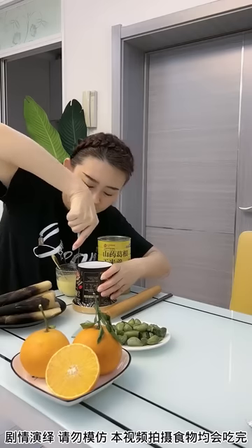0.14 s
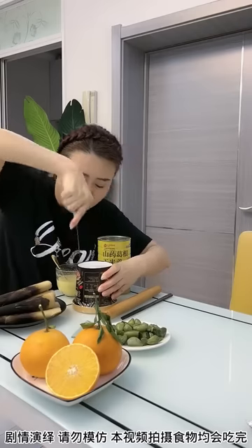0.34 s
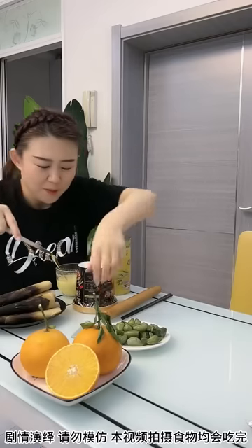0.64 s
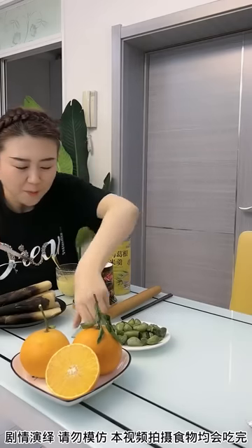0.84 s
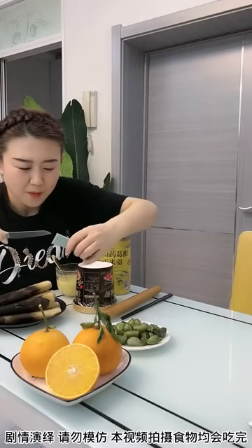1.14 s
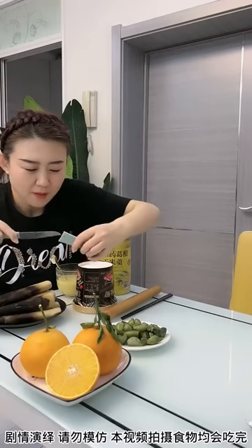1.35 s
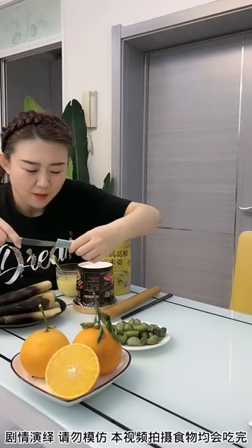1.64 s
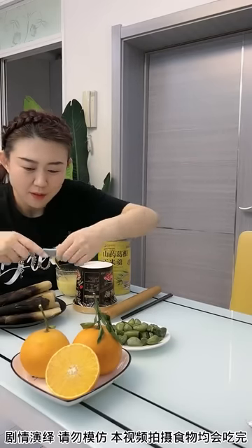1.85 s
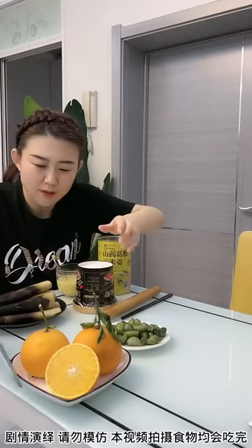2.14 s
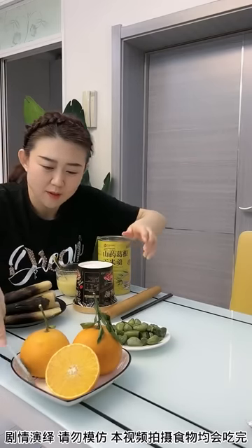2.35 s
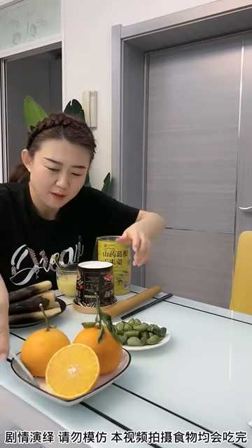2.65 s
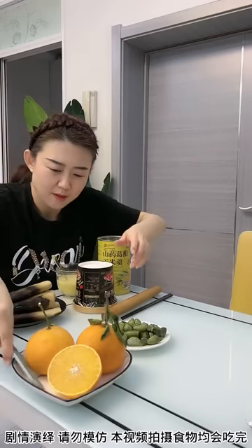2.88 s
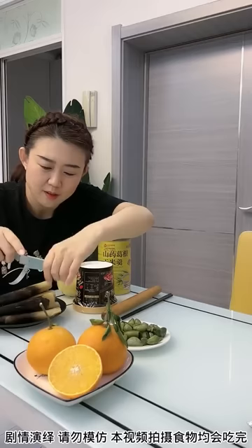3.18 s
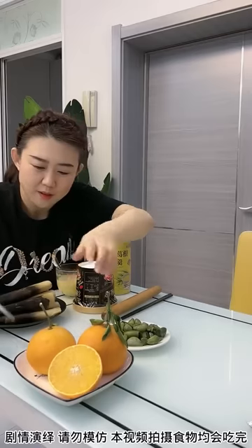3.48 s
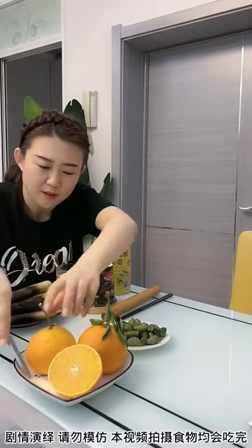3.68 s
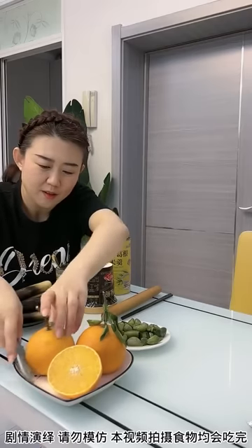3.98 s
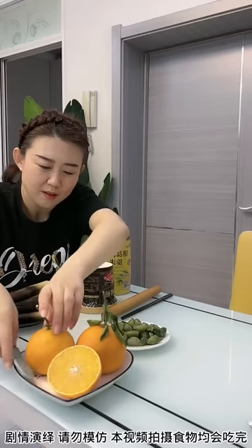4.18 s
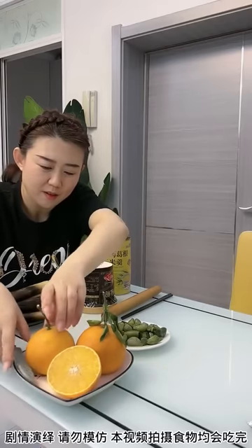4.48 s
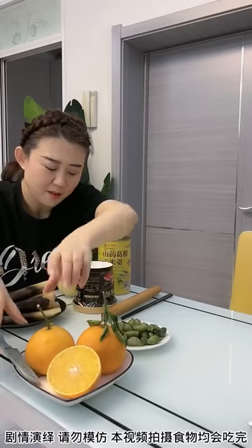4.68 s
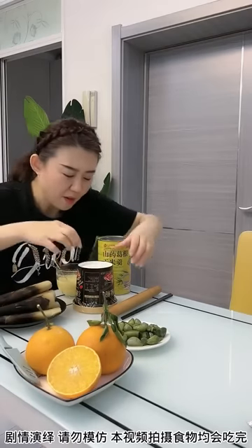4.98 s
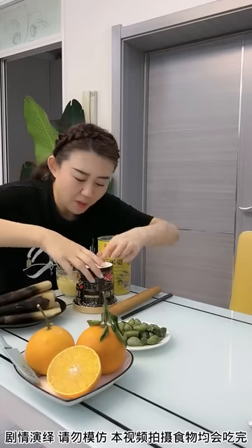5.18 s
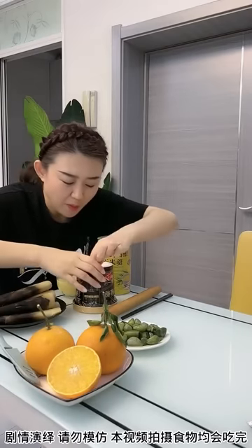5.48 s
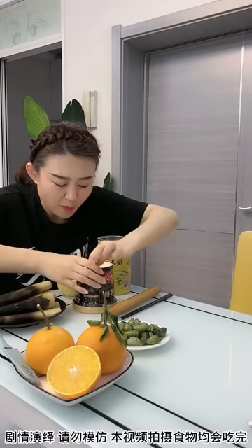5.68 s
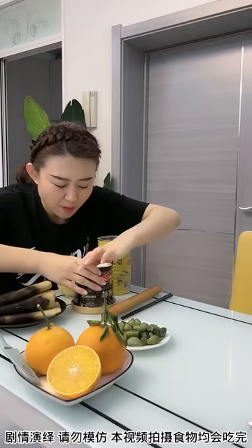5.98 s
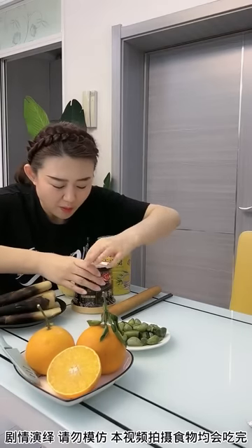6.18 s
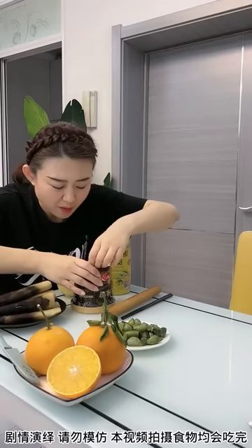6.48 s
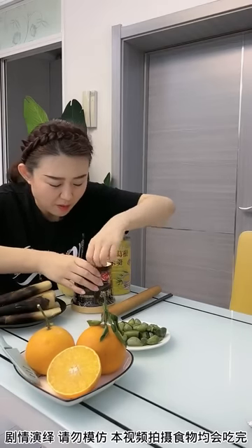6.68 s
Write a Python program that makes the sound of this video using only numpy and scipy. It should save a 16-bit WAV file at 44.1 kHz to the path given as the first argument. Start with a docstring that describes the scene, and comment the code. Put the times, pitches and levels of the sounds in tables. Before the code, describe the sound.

Close stereo microphone at a kitchen table with a short, hard room tail. Brief squeaky prying scrapes open it, then a loud knock and a light metal piece settling. A quiet middle holds isolated steel clicks, scuffs and dull china taps, one strong. The end is dense, uneven rubbing of a hollow can with a sharp snap and a last deep pop.

```python
"""First a rim squeaks, rasps and snaps as a knife pries the lid off a small can at a kitchen table.
The metal is dropped, tapped and laid on a china plate; then hands press and twist the lid on the can.
Contacts are noise bursts with decaying modes, rubbing is stick-slip jerks through a hollow body,
thumps are short low tones, and a small, hard room answers each with a diffuse noise tail.
A low rumble and a faint hiss lie beneath."""
import sys
import numpy as np
from scipy import signal
from scipy.fft import rfft, irfft, next_fast_len
from scipy.io import wavfile
from scipy.ndimage import uniform_filter1d, map_coordinates

SR = 44100
rng = np.random.default_rng(int(sys.argv[2]) if len(sys.argv) > 2 else 0)


def store_pcm(level_fs):
    """Save levels as 16-bit WAV."""
    pcm = np.round(np.clip(level_fs, -1, 1) * 32767).astype(np.int16)
    wavfile.write(sys.argv[1], SR, np.atleast_2d(pcm).T)


N = 301203

# Noise spectrum of a crack on the board or the rim.
# Each row: frequency in Hz, density in dB per Hz.
CRACK_SPECTRUM = [(40, -40), (120, -18), (250, -4), (600, -2), (1150, -4), (1800, 2), (2400, -1), (3200, 1),
                  (5000, -3), (10000, -5), (12500, -11), (16000, -17)]
# Noise spectrum of a crack of steel.
# Each row: frequency in Hz, density in dB per Hz.
STEEL_SPECTRUM = [(40, -45), (300, -14), (900, -4), (1400, -9), (2100, -5), (3000, 2), (4300, -2),
                  (5000, 2), (6300, -6), (7500, 1), (8700, -6), (10400, -3), (12500, -10), (16000, -15)]


def amp(db):
    """Level law: decibels to an amplitude gain."""
    return 10 ** (np.asarray(db) / 20)


def unit(x):
    """Normalisation by mean power: scaled to rms 1."""
    return x / np.sqrt(np.mean(x ** 2) + 1e-20)


def along(points, hz):
    """Logarithmic frequency scale: (Hz, value) points read between on a log axis."""
    f, value = np.transpose(points)
    return np.interp(np.log(hz + 1), np.log(f + 1), value)


def filtered(x, response):
    """Linear filtering: the spectrum of x times a complex response of frequency."""
    n = x.shape[-1]
    size = next_fast_len(n + SR // 10)
    return irfft(rfft(x, size) * response(np.fft.rfftfreq(size, 1 / SR)), size)[..., :n]


def coloured(x, points, size=2048):
    """Minimum phase: a causal filter whose gain follows the (Hz, dB) points, by folding the cepstrum."""
    cepstrum = irfft(np.log(amp(along(points, np.fft.rfftfreq(size, 1 / SR)))))
    cepstrum[1:size // 2] *= 2
    cepstrum[size // 2 + 1:] = 0
    impulse = irfft(np.exp(rfft(cepstrum)))
    return signal.fftconvolve(x, impulse)[:len(x)]


def dying(t, t60):
    """Exponential decay: 60 dB are lost in t60 seconds."""
    return np.exp(-np.log(1000) * t / t60)


def add(track, s, sound):
    """Superposition: a sound mixed into the track at time s."""
    start = max(round(s * SR), 0)
    track[start:start + len(sound)] += sound[:max(N - start, 0)]


def wobble(rate):
    """Band-limited fluctuation: a smooth random curve, rate knots a second."""
    knots = rng.standard_normal(int(N * rate / SR) + 4)
    return map_coordinates(knots, [np.arange(N) * rate / SR])


def chatter(t, depth_db, rate=450):
    """Repeated contact: hard surfaces touch many times, which makes a fast, uneven gain."""
    knots = rng.standard_normal(1000)
    return amp(depth_db * np.interp(t * rate, np.arange(len(knots)), knots))


def echo(x):
    """Diffuse reverberation: a fresh noise tail of x, each frequency dying at its own speed."""
    # Each row: frequency in Hz, decay time t60 in seconds.
    decay_times = [(100, .35), (500, 0.17), (2000, .19), (5000, 0.18), (10000, 0.17), (16000, 0.013)]
    hz, t, z = signal.stft(rng.standard_normal(SR // 3), SR, nperseg=256)
    z = z * dying(t, along(decay_times, hz)[:, None])
    tail = signal.istft(z, SR, nperseg=256)[1]
    t = np.arange(len(tail)) / SR
    build_up_s = 0.009
    tail = tail * (1 - np.exp(-(t / build_up_s) ** 2)) * chatter(t, depth_db=2.5)
    return signal.fftconvolve(x, tail / np.linalg.norm(tail))[:len(x)]


def in_room(x, wet_db):
    """Superposed sound fields: the direct sound and the room's answer."""
    return x + amp(wet_db) * echo(x)


def two_ports(x, direct_db, diffuse_db=-17):
    """Stereo difference: the ports differ by a phase shift of the direct sound and by the diffuse field."""
    # Side signal of the direct sound, before direct_db. Each row: frequency in Hz, level in dB.
    direct_width = [(100, -12.5), (350, -11.5), (700, -3), (1300, 3), (2100, -17), (4400, -2.5), (8000, 2),
                    (15000, -7.5)]
    # Side signal of the diffuse field, before diffuse_db. Each row: frequency in Hz, level in dB.
    diffuse_width = [(100, -17.5), (300, -13.5), (600, 7), (1500, -12.5), (4000, -3.5), (12000, 0.5)]

    def shifted(hz):
        gain = amp(direct_db + along(direct_width, hz))
        return gain * 1j * np.cos(2 * np.pi * np.log2(hz + 1))

    diffuse = filtered(echo(x), lambda hz: amp(diffuse_db + along(diffuse_width, hz)))
    side = filtered(x, shifted) + diffuse
    return np.array([x + side, x - side])


def slips(rate, spread_db):
    """Stick and slip: random tiny jerks of very unequal size, about rate of them a second."""
    slipping = rng.random(N) < rate / SR
    size = amp(spread_db * np.clip(rng.standard_normal(N), -2, 2))
    return unit(slipping * size * rng.choice([-1, 1], N))


def patchy(x, depth_db, size=512):
    """Shifting excitation: the touching spot keeps moving, so the favoured resonances keep changing."""
    z = signal.stft(x, nperseg=size)[2]
    field = uniform_filter1d(rng.standard_normal(z.shape), size=4, axis=0)
    field = uniform_filter1d(field, size=4, axis=1)
    gain = amp(depth_db * np.clip(unit(field), -2, 1))
    return signal.istft(z * gain, nperseg=size)[1][:N]


def stroke(t, length):
    """Friction follows load: the hand's pressure swells to its hardest push at t = 0, then lets go."""
    away = np.abs(t) / length
    return np.exp(-np.minimum(away, 20) ** 1.19)  # exponent 1 is a pointed crest, 2 a bell


def hollow_can(f, pitch_hz):
    """Body resonance: the grip and the seat of the lid shift all the can's resonances together."""
    # Each row: centre and width as multiples of the can's pitch, level in dB.
    resonances = [(.55, .25, -9), (.78, .28, -4), (1, .24, 0), (1.3, .22, -6), (1.75, .4, -9),
                  (2.3, .5, -13)]
    low_hz = 190  # the can radiates little below this
    ratio = f / pitch_hz
    radiated = (1j * f / (low_hz + 1j * f)) ** 2
    body = 0
    for k, (centre, width, db) in enumerate(resonances):
        damping = 1j * ratio * width
        body = body + (-1) ** k * amp(db) * damping / (centre * centre - ratio * ratio + damping)
    return radiated * body


def rubbing(rows, body_db, rasp_db, catch_db, wet_db):
    """Stick-slip friction: clumps of jerks and larger catches rasp directly and sound the hollow body."""
    # Each row: frequency in Hz, density of the rasp in dB per Hz.
    rasp_spectrum = [(200, -40), (500, -12), (1000, 1), (1800, 0), (3000, -3.5), (4200, -7), (6500, -8),
                     (10000, -18), (12500, -28), (16000, -34)]
    fine = slips(rate=3400, spread_db=4) * amp(2 * wobble(160))
    jerks = unit(patchy(fine, depth_db=3))
    jerks = jerks + amp(catch_db) * slips(rate=140, spread_db=-0.5)
    grit = coloured(jerks, rasp_spectrum)
    track, t = np.zeros(N), np.arange(N) / SR
    for s, db, length, pitch_hz, edge_db in rows:
        near = np.abs(t - s) < 5 * length
        body = unit(filtered(jerks[near], lambda f: hollow_can(f, pitch_hz)))
        rasp = unit(grit[near])
        mixture = amp(body_db) * body + amp(rasp_db + edge_db) * rasp
        track[near] += amp(db) * stroke(t[near] - s, length) * mixture
    return in_room(track, wet_db)


def sliding(rows, colour, wet_db):
    """Sliding friction: fine slips, coloured and scaled by the pressure of each stroke."""
    jerks = patchy(slips(rate=4000, spread_db=3.5), depth_db=2.5)
    t = np.arange(N) / SR
    power = sum((amp(db) * stroke(t - s, length)) ** 2 for s, db, length in rows)
    return in_room(np.sqrt(power) * unit(coloured(jerks, colour)), wet_db)


def voiced(blow, levels_db):
    """Contact stiffness: the hardness of a contact sets the strength of its first 20 ms in each band."""
    # Edges of the bass, middle, treble and top, in Hz.
    band_edges = [150, 900, 3500, 8000, 16000]
    # Filter points for the bass, the two ends of the middle, the treble and the top, in Hz.
    tone_hz = [420, 1150, 2800, 5300, 11300]
    onset = blow[:SR // 50]
    spectrum = rfft(onset, SR)  # bins of 1 Hz
    power = np.cumsum(2 * np.abs(spectrum) ** 2) / (SR * len(onset))
    present_db = 10 * np.log10(np.diff(power[band_edges]) + 1e-20)
    bass, middle, treble, top = levels_db - present_db
    return coloured(blow, list(zip(tone_hz, [bass, middle, middle, treble, top])))


def contacts(rows, modes, colour, crack_t60, rise, impact_db, ring_db, sustain_db, wet_db, top_db):
    """Modal excitation: a touch and a short chatter ring the modes; weight adds bass, hardness treble."""
    track, t = np.zeros(N), np.arange(SR // 3) / SR
    hz, mode_db, t60 = np.transpose(modes)[:, :, None]
    for s, db, weight_db, hardness_db, touch, accent_hz in rows:
        free = np.maximum(t - touch, 0)
        # modes within about .07 octave of the favoured one ring up to 9 dB stronger
        accent_db = 9 * np.exp(-(np.log2(hz / accent_hz) / .07) ** 2)
        # most of the ring is damped as the touch ends; a weaker part lingers
        damped = amp(accent_db) * dying(free, t60=0.014)
        lingering = amp(sustain_db) * dying(t, t60)
        strength = amp(mode_db + 2 * rng.standard_normal(hz.shape))
        phase = rng.uniform(0, 2 * np.pi, hz.shape)
        partials = strength * np.sin(2 * np.pi * hz * t + phase)
        ring = np.sum(partials * (damped + lingering), axis=0)

        impact = amp(impact_db) * dying(free, t60=0.012)
        force = (impact + dying(t, crack_t60)) * chatter(t, depth_db=3)
        crack = coloured(rng.standard_normal(len(t)) * force, colour)

        swell = 1 - np.exp(-(t / (rise + .45 * touch)) ** 2)
        blow = unit(crack * swell) + amp(ring_db) * unit(ring * swell)
        levels_db = db + np.array([weight_db, 0, hardness_db, hardness_db + top_db])
        add(track, s, voiced(in_room(blow, wet_db), levels_db))
    return track


def ambience(rumble_db=1, hiss_db=-62, split_hz=320):
    """Stationary background noise: a low rumble of varying level and a faint, steady hiss."""
    # Each row: time in seconds, rumble level in dB before rumble_db.
    rumble_levels = [(0.0, -56), (0.85, -54), (1.15, -65.5), (1.75, -64.5), (2.3, -54), (6.83, -53.5)]
    # Each row: frequency in Hz, density in dB per Hz.
    air_spectrum = [(15, -18), (30, -6), (90, 2), (180, -4), (300, -14), (500, -20), (1000, -26),
                    (2000, -27), (4000, -32), (8000, -35), (11000, -40), (16000, -50)]
    air = coloured(rng.standard_normal(N), air_spectrum)
    low = filtered(air, lambda hz: 1 / (1 + (hz / split_hz) ** 4))
    times, level_db = np.transpose(rumble_levels)
    t = np.arange(N) / SR
    level = amp(np.interp(t, times, level_db)) * (t >= times[0]) * (t <= times[-1])
    return amp(rumble_db) * level * unit(low) + amp(hiss_db) * unit(air - low)


def surrounding():
    """Partial coherence: an independent side noise makes the ports differ by frequency, least in the bass."""
    # Each row: frequency in Hz, side level in dB.
    noise_width = [(100, -23), (200, -8.5), (400, 1.5), (1300, 5.5), (2200, -11.5), (3800, -1), (12000, -2)]
    mid = ambience()
    side = filtered(ambience(), lambda hz: amp(along(noise_width, hz)))
    return np.array([mid + side, mid - side])


def squeaks(overtone_db=-15):
    """Locked stick-slip: the metal edge catches, and its slips keep one unsteady pitch for milliseconds."""
    # Each row: centre in seconds, level in dB, mean pitch in Hz, half length in seconds.
    events = [(0.015, -32.5, 1492, 0.012), (0.034, -25.5, 976, 0.0047), (0.077, -26.5, 1486, 0.0093),
              (5.314, -18.5, 1415, 0.0051)]
    track, t = np.zeros(N), np.arange(N) / SR
    clock = np.cumsum(1 + .27 * wobble(1100)) / SR  # uneven time makes the pitch unsteady
    for s, db, hz, half in events:
        near = np.abs(t - s) < 4 * half
        phase = 2 * np.pi * hz * clock[near]
        tone = np.sin(phase) + amp(overtone_db) * np.sin(2 * phase)
        track[near] += amp(db) * np.exp(-((t[near] - s) / half) ** 2) * tone
    return in_room(track, wet_db=-17)


def prying():
    """Friction on a shell: the knife tip scrapes in short pushes under the lid."""
    # Each row: hardest push in seconds, level in dB, length in seconds, pitch of the can in Hz,
    # rasp of the edge in dB.
    pushes = [(0.015, -31.5, 0.027, 686, -7), (0.04, -26, 0.014, 916, -8.5), (0.078, -29, 0.01, 1380, -4.5),
              (0.1, -41.5, 0.02, 507, -6.5), (0.14, -29.5, 0.012, 470, -1.5), (0.2, -35, 0.023, 700, 4),
              (0.262, -34, 0.013, 484, 1.5), (0.33, -37.5, 0.02, 472, 5.5), (0.375, -27.5, 0.011, 487, 1.5),
              (0.425, -37.5, 0.022, 417, 2.5), (0.462, -35, 0.015, 470, -1), (0.497, -31, 0.0057, 530, 5.5),
              (0.524, -35.5, 0.0091, 483, 2.5)]
    return rubbing(pushes, body_db=-10, rasp_db=-5, catch_db=-11, wet_db=-6.5)


def snaps():
    """Damped modes: the lid snaps over the rim while the hand stifles its ring."""
    # Each row: start in seconds, strength in dB, weight in the bass in dB, hardness in the treble in dB,
    # touch length in seconds, favoured mode in Hz.
    events = [(0.185, -40.5, -8, -5, .005, 1736), (0.324, -44.5, -13, -6, .002, 2510),
              (0.344, -45, 8.5, -10.5, .003, 857), (0.379, -36, 15.5, -1.5, .007, 2510),
              (0.484, -47.5, 12.5, 9, .003, 5200), (5.311, -37.5, -0.5, 1.5, .004, 1736),
              (5.352, -32, 4.5, -11.5, .006, 2510), (5.463, -35, -11, -9, .004, 2510),
              (5.476, -35.5, 6.5, -9, .005, 2510), (5.703, -35.5, 13.5, -4, .007, 625),
              (5.764, -35, 13, -7, .008, 857), (6.22, -32.5, 2.5, -4.5, .01, 857),
              (6.246, -24.5, -2.5, -12, .004, 1736), (6.2535, -21.5, -5, -3.5, .002, 1736),
              (6.293, -38, 14, -10.5, .005, 460), (6.369, -37, -12, -17, .002, 1230),
              (6.411, -33.5, 11.5, -7, .003, 625), (6.431, -40, 7.5, -11, .005, 1230),
              (6.491, -35, -4, -16.5, .004, 857), (6.575, -40, -8, -11.5, .003, 1736),
              (6.607, -32.5, -8, -7, .0015, 1736), (6.661, -32, -17, -18, .002, 1230)]
    # Each row: frequency in Hz, level in dB, decay time t60 in seconds.
    lid_modes = [(460, -1, .1), (625, 1, .14), (857, -4, .12), (1230, -5, .08), (1736, 0, .06),
                 (1984, -5, .08), (2510, -3, .1), (3206, -6, .08), (5200, -10, .1), (5900, -9, .1)]
    return contacts(events, lid_modes, CRACK_SPECTRUM, crack_t60=0.035, rise=0.0008, impact_db=2,
                    ring_db=-2, sustain_db=-18, wet_db=-7.0, top_db=-8.5)


def thumps(overtone=1.83, wet_db=-16, overtone_db=-13, rise=0.002):
    """Panel vibration: flexing lid, hollow can or table top rings briefly and low, with one overtone."""
    # Each row: start in seconds, level in dB, pitch in Hz, decay time t60 in seconds.
    events = [(0.381, -8, 312, .075), (0.84, -23, 151.5, .11), (2.204, -30, 325, .11),
              (4.375, -27, 120.3, 0.062), (5.026, -19, 249.6, 0.12), (5.024, -21.5, 100.7, 0.21),
              (5.708, -2.5, 340.7, 0.027), (5.765, -17.5, 226, .07), (6.697, -3.5, 468.4, 0.071),
              (6.705, -7.5, 290, 0.055), (6.709, -9, 441, 0.021), (6.718, 1.5, 420.5, 0.054)]
    track, t = np.zeros(N), np.arange(SR // 3) / SR
    swell = 1 - np.exp(-(t / rise) ** 2)
    for s, db, hz, t60 in events:
        phase = 2 * np.pi * hz * t
        tone = np.sin(phase) + amp(overtone_db) * np.sin(overtone * phase)
        add(track, s, amp(db) * tone * dying(t, t60) * swell)
    return in_room(track, wet_db)


def knocks():
    """Impact on a plate: the knife handle and the can knock on the board and ring its modes."""
    # Each row: start in seconds, strength in dB, weight in the bass in dB, hardness in the treble in dB,
    # touch length in seconds, favoured mode in Hz.
    events = [(0.84, -18, -16, -17.5, 0.0014, 1976), (0.844, -20, -15.5, -11, 0.0014, 883),
              (0.8474, -18.5, -14, -17.5, .004, 3210), (0.882, -34, 0, -11.5, .004, 1976),
              (0.945, -35, -9, -3, 0.012, 2700), (2.191, -36, -5.5, -6.5, 0.0078, 1523),
              (2.203, -42, -0.5, -7.5, .008, 619), (3.234, -44, 0.5, -2, .008, 2335),
              (3.354, -41.5, -4.5, -2, 0.0016, 3210), (4.59, -47, 5, -12, 0.0097, 1523),
              (5.008, -36, 8, -15, 0.0048, 1090), (5.019, -39.5, 13, -11.5, 0.0048, 883)]
    # Each row: frequency in Hz, level in dB, decay time t60 in seconds.
    board_modes = [(619, -8, .12), (883, -2, .14), (1090, -5, .08), (1523, -2, .12), (1740, -3, .15),
                   (1976, 3, .21), (2335, -1, .16), (2700, -1, .14), (3210, -4, .2), (3957, -9, .14),
                   (4730, -13, .12)]
    return contacts(events, board_modes, CRACK_SPECTRUM, crack_t60=0.12, rise=0.0006, impact_db=19,
                    ring_db=3.5, sustain_db=-25, wet_db=-4.5, top_db=-12)


def clinks():
    """Impact of a free shell: the loose metal lid clatters and settles, ringing in dense modes."""
    # Each row: start in seconds, strength in dB, weight in the bass in dB, hardness in the treble in dB,
    # touch length in seconds, favoured mode in Hz.
    events = [(0.997, -26, -26.5, -2, .0015, 4989), (1.005, -22.5, -14, -1, .002, 5093),
              (1.01, -29, -9, -1, .003, 3020), (1.0158, -29.5, -20.5, 8, .002, 7530),
              (1.038, -35.5, -22.5, -6.5, .007, 3749), (1.092, -42, -41, -5, .012, 2708)]
    # Each row: frequency in Hz, level in dB, decay time t60 in seconds.
    steel_modes = [(1739, -4, .2), (1978, -5, .2), (2227, -7, .2), (2708, -5, .25), (2932, -5, .25),
                   (3020, -6, .25), (3749, -2, .25), (4113, -6, .28), (4560, -7, .25), (4838, -5, .2),
                   (4989, 0, .25), (5093, -1, .25), (5819, -6, .15), (7142, -4, .18), (7456, -1, .2),
                   (7530, -2, .2), (7622, -1, .18), (8070, -8, .2), (9238, -8, .17), (10370, -7, .2)]
    return contacts(events, steel_modes, STEEL_SPECTRUM, crack_t60=0.18, rise=0.0004, impact_db=19.5,
                    ring_db=3.5, sustain_db=-20, wet_db=-8.5, top_db=-5)


def skating():
    """Sliding friction: the blade skates over metal, and two duller scuffs follow a different spectrum."""
    # Both event tables, each row: hardest push in seconds, level in dB, length in seconds.
    slides = [(1.1, -38.5, 0.0096), (1.745, -37, 0.0136), (1.81, -29, 0.0043), (3.305, -46, 0.011),
              (3.34, -40, 0.012), (3.44, -48.5, 0.013)]
    scuffs = [(2.948, -40.5, 0.017), (2.972, -40.5, .014)]
    # Both spectra, each row: frequency in Hz, density in dB per Hz.
    blade_spectrum = [(700, -45), (1600, -24), (2200, -4), (3150, 2), (4200, -4), (7500, -6), (8800, -16),
                      (10500, -12), (12000, -24), (16000, -30)]
    scuff_spectrum = [(300, -14), (1100, -14), (1750, 0), (2500, -3), (4000, -14), (7000, -24),
                      (16000, -42)]
    return sliding(slides, blade_spectrum, wet_db=-3) + sliding(scuffs, scuff_spectrum, wet_db=-13)


def clicks():
    """Impact on a bar: the knife blade clicks against metal, and twice against the china plate, and rings its
    high modes."""
    # Each row: start in seconds, strength in dB, weight in the bass in dB, hardness in the treble in dB,
    # touch length in seconds, favoured mode in Hz.
    events = [(1.487, -47, -33, 3.5, 0.0058, 4430), (1.6912, -31.5, -20, 4.5, .0003, 3120),
              (1.709, -46, -12, 10.5, .003, 4016), (1.781, -45, -41, 1, 0.0039, 2665),
              (1.796, -59.5, -34, -1, 0.0032, 3214), (1.809, -58, -34, 10, .003, 3214),
              (1.842, -50, -39, 1.5, 0.005, 4430), (1.855, -58.5, -37, -0.5, 0.0015, 4759),
              (1.986, -52, -1, 1, 0.007, 2665), (2.397, -44, -32, 2, 0.00049, 4016),
              (3.022, -67, -16, 7.5, 0.0044, 5459), (3.661, -48, -5.5, 2.5, 0.0042, 9620),
              (3.74, -35.5, -10, 5, 0.0024, 4759), (3.75, -47.5, 12, -5, 0.001, 3214),
              (4.264, -40, -13, 0.5, 0.0033, 2665)]
    # Each row: frequency in Hz, level in dB, decay time t60 in seconds.
    knife_modes = [(2665, -5, .15), (3120, -1, .15), (3214, -1, .2), (3620, -2, .15), (4016, 0, .16),
                   (4430, 0, .15), (4759, -3, .2), (5459, -4, .2), (7009, -4, .1), (7600, -4, .15),
                   (9620, -8, .1), (10400, -9, .08), (11600, -11, .08), (13400, -13, .07)]
    return contacts(events, knife_modes, STEEL_SPECTRUM, crack_t60=0.12, rise=0.0004, impact_db=21.5,
                    ring_db=-3.5, sustain_db=-8.5, wet_db=-4.0, top_db=-5)


def taps():
    """Impact on a loaded plate: the knife touches the china, whose lingering ring is weak."""
    # Each row: start in seconds, strength in dB, weight in the bass in dB, hardness in the treble in dB,
    # touch length in seconds, favoured mode in Hz.
    events = [(2.473, -31.5, -12, -12.5, 0.0062, 2790), (2.768, -46, -16, -1.5, 0.0061, 2702),
              (3.8135, -30, -13.5, -13.5, 0.0062, 2310), (4.228, -40.5, -27, -8, 0.0052, 3100),
              (4.3705, -18.5, -21, -14, 0.0031, 1920), (4.376, -35, 3, -2, .002, 3280)]
    # Each row: frequency in Hz, level in dB, decay time t60 in seconds.
    china_modes = [(650, -11, .1), (1400, -10, .06), (1600, -7, .06), (1852, 1, .06), (1975, -5, .06),
                   (3074, -6, .1), (2190, -6, .08), (2430, -6, .07), (2702, -2, .12), (3300, -4, .14),
                   (3634, -7, .15), (4040, -7, .15), (5660, -9, .15), (7020, -10, .14), (7470, -13, .14),
                   (9930, -20, .12)]
    # Crack of steel on china. Each row: frequency in Hz, density in dB per Hz.
    china_spectrum = [(40, -40), (250, -10), (650, -8), (1000, -11), (1400, -4), (1900, 0), (2700, 0),
                      (3600, -4), (5000, -6), (7500, -14), (12000, -30), (16000, -48)]
    return contacts(events, china_modes, china_spectrum, crack_t60=.035, rise=0.0005, impact_db=16,
                    ring_db=3.5, sustain_db=-23, wet_db=-6.5, top_db=-16.0)


def twisting():
    """Friction on a shell: hands twist the lid on the can in short pushes, and the body speaks strongly."""
    # Each row: hardest push in seconds, level in dB, length in seconds, pitch of the can in Hz,
    # rasp of the edge in dB.
    pushes = [(5.325, -29, 0.01185, 510, -6), (5.365, -34, 0.0058, 366, -1), (5.412, -39, 0.032, 395, 2.5),
              (5.485, -31, 0.021, 387, -4), (5.526, -36.5, 0.0047, 345, -13), (5.556, -38, .012, 410, 4),
              (5.667, -46.5, 0.02, 480, 5.5), (5.72, -32.5, 0.017, 521, -10), (5.747, -28, 0.01, 400, -1),
              (5.78, -31, 0.016, 327.5, -6.5), (5.812, -37, 0.018, 426, 4), (5.86, -41, 0.02, 515, 7),
              (5.92, -29, 0.021, 562, 1.5), (5.975, -39, 0.016, 355, 3.5), (6.018, -46.5, 0.022, 444, 9.5),
              (6.052, -44, 0.0039, 620, 0), (6.083, -26, 0.0104, 681, -2.5), (6.107, -27, .017, 631, -5),
              (6.185, -37.5, .012, 440, -9.5), (6.223, -28.5, 0.011, 655, -7),
              (6.272, -29, 0.0095, 604, -7.5), (6.297, -28, 0.013, 499, -9.5),
              (6.335, -31.5, 0.029, 446, -3.5), (6.44, -27.5, 0.016, 670, -7),
              (6.475, -37.5, 0.014, 457, 2.5), (6.538, -33.5, 0.0081, 471, -3.5), (6.6, -40, 0.038, 435, 3),
              (6.645, -44, .018, 441, -9), (6.69, -26.5, 0.011, 456, 2), (6.709, -21.5, .011, 848, -22.5),
              (6.76, -36.5, 0.02, 460, -3.5), (6.825, -44.5, 0.0124, 476, 8)]
    return rubbing(pushes, body_db=2, rasp_db=-2.0, catch_db=-17, wet_db=-9.5)


def scene():
    """Superposition: the knife's sounds, the can's narrower sounds and the room's noise at two ports."""
    can = squeaks() + prying() + snaps() + thumps() + twisting()
    knife = knocks() + clinks() + skating() + clicks() + taps()
    return two_ports(knife, direct_db=-2.5) + two_ports(can, direct_db=-6.5) + surrounding()


def record(dry):
    """Band limiting: nothing is kept at or above 15.9 kHz."""
    return filtered(dry, lambda hz: hz < 15900)


dry = scene()
out = record(dry)
store_pcm(out)
```